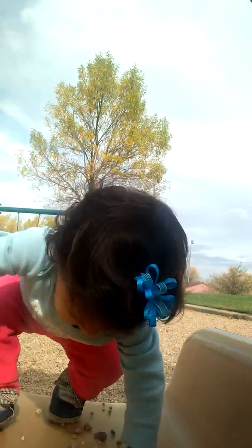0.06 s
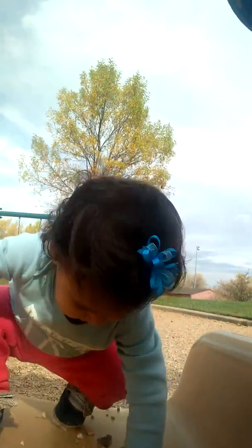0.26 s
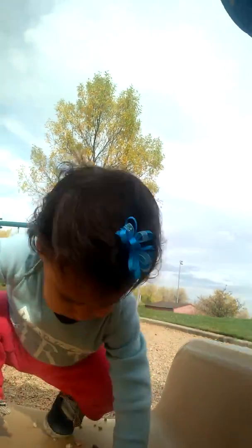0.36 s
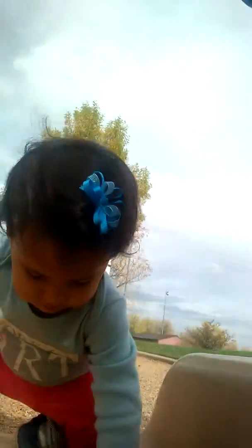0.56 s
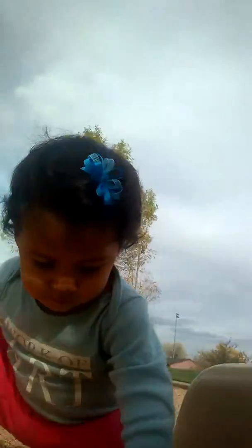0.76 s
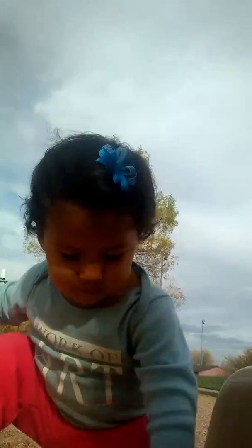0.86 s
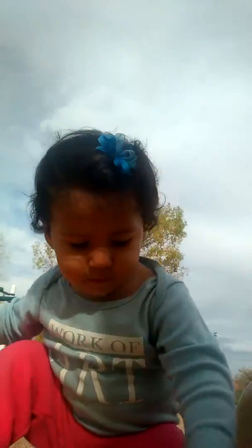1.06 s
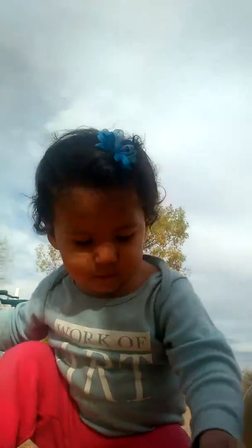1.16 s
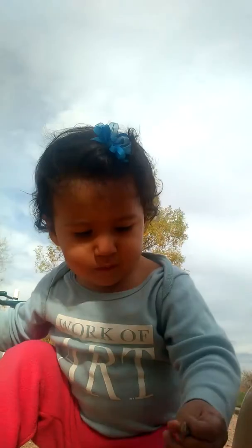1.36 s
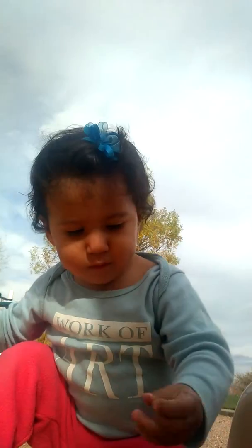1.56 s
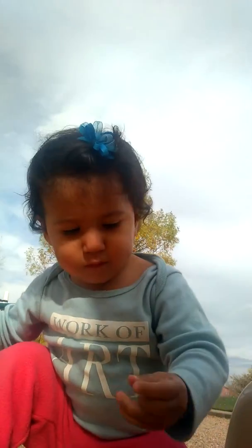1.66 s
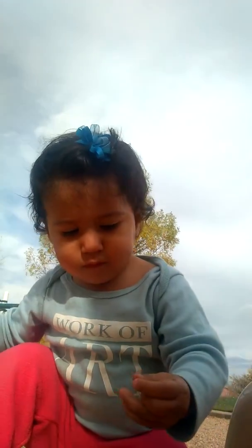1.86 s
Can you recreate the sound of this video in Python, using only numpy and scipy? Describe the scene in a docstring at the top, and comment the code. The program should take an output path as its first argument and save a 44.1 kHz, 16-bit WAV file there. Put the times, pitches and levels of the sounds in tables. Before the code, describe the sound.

Small pebbles are dragged over a hollow plastic playground slide with a gritty, rattling crunch and low bumps, then quieten to sparse ticks and a few sharp clacks, heard close on a phone outdoors.

```python
"""Pebbles are dragged and gathered by a small hand on a hollow plastic slide outdoors.
Random clicks make the shell and stones ring as they roll and scrape; grainy noise makes the grit hiss.
Single pebbles knock with a crack, a clack and a thump, and a thin squeak glides upward.
Filtered noise gives the deep boom, a faint hum and the open air.
A phone's two opposed ports listen: the far one hears later and with opposite sign."""
import sys
import numpy as np
from scipy import signal
from scipy.fft import rfft, irfft, next_fast_len
from scipy.io import wavfile

SR = 44100
rng = np.random.default_rng(int(sys.argv[2]) if len(sys.argv) > 2 else 0)


def volts(x):
    """Linear amplitude factor 10**(x/20) for a level x in dB, scalar or array-like."""
    e = np.asarray(x, float) / 20
    return 10 ** e


def wrap_up_sound(samples):
    """Save the sound to the file named by the first command line argument, as 16-bit audio."""
    columns = np.atleast_2d(samples).T
    # keep every value between -1 and 1, then stretch to whole-number steps
    tamed = np.clip(columns, -1, 1)
    steps = np.round(tamed * 32767).astype(np.int16)
    wavfile.write(sys.argv[1], SR, steps)


N = 83790  # length [samples]

# how strongly the stones drag, before each layer's own gain: (time [s], deep boom [dB],
# low shell ring [dB], high shell ring [dB], scrape [dB], grit [dB])
DRAG_LEVELS = [(0, -47, -59, -43, -43, -40), (.05, -55.5, -71, -48, -44, -46.5),
               (.17, -44, -55, -51, -48.5, -47), (.23, -41.5, -42.5, -41.5, -40.5, -39),
               (0.267, -52, -20, -34.5, -32.5, -34), (.32, -53, -56, -27, -33.5, -31.5),
               (0.357, -46, -53, -20, -34, -31.5), (0.389, -53, -38, -28.5, -30, -33.5),
               (0.427, -69, -67, -22.5, -32, -31.5), (.47, -38.5, -49, -26.5, -34.5, -32.5),
               (.52, -35.5, -35, -23.5, -32, -34.5), (.57, -32, -44, -30, -33.5, -34),
               (0.631, -33, -30, -30, -35, -31.5), (.7, -34, -38.5, -34.5, -37, -35.5),
               (.77, -34, -34, -34.5, -40.5, -36), (.83, -42.5, -34, -39.5, -37.5, -38.5),
               (.91, -37, -37.5, -40.5, -39.5, -38.5), (.97, -29, -35.5, -34, -37.5, -37),
               (1.01, -50, -38, -37, -40.5, -39), (1.05, -39.5, -45, -43.5, -45.5, -46),
               (1.102, -43, -44.5, -48.5, -49, -43.5), (1.134, -52, -70, -58, -58.5, -65.5),
               (1.28, -49, -68, -56, -58.5, -55), (1.4, -54.5, -81, -58.5, -58, -59.5),
               (1.456, -52, -74, -61, -63, -57), (1.474, -50, -36, -76, -52, -54),
               (1.51, -36, -43, -61, -52, -46.5), (1.55, -40.5, -41.5, -48, -46, -47),
               (1.612, -40, -37.5, -64, -45.5, -43), (1.63, -49, -47, -46, -82, -104),
               (1.655, -87, -63, -61, -70, -100), (1.7, -56, -53, -58, -55, -62.5),
               (1.77, -68, -63.5, -69, -80, -66.5), (1.9, -56.5, -77, -69.5, -71, -59.5)]
# single pebbles knocking, before each part's own gain: (time [s], crack peak [dB],
# shell thump [dB], stone clack [dB], dull part of crack [dB]); the last three are relative to the peak
KNOCKS = [(0.0146, -19, -14, -36, -11), (0.0589, -20, -22, -21, -10), (0.0933, -25, -30, -29, -29),
          (0.1342, -26.5, -16, -7, -26), (0.3316, -18.5, -25, -18, 7.5), (0.3547, -24, 11.5, 0.5, 8),
          (0.4264, -18.5, 1, -3, -21), (0.4895, -18, 10.5, -3, -13), (0.7084, -16, -4, -7, 3.5),
          (0.7548, -11, -17, -25, -18), (0.7615, -6, -15, -23, -8.5), (0.8771, -19, -8, 4.5, 5.5),
          (0.9122, -45, 5, -11, -11), (0.9176, -38, 12, -9, -8), (0.9256, -9.5, -12, -13, -10),
          (0.9275, -16.5, 5.5, -1, 4.5), (0.9335, -28, -13, -18, -14), (0.9579, -12, -25, -14.5, -8),
          (0.9714, -23.5, -19, -19, 3.5), (0.989, -2.5, -16, -37, -19.5), (1.1548, -39.5, 4, 0.5, 5),
          (1.1763, -44, -8, 4.5, 9), (1.1951, -41, 0, 3.5, 13.5), (1.2016, -16, -41, -20, -18.5),
          (1.2141, -44, -2, -5, 9.5), (1.2492, -27, -6.5, -18, -12), (1.2815, -36, -18, -23, -22),
          (1.307, -41, -8, -3, -16), (1.3266, -23, -31, -23, -12), (1.3402, -29.5, -27, -8.5, -5),
          (1.3546, -26.5, -5, -20, -10.5), (1.3665, -39.5, -10, -7, -9), (1.4157, -27, -20, -24, -16.5),
          (1.4626, -28.5, -21, -27, -24), (1.4717, -34, 13.5, -20, -20), (1.4998, -44, -13, 15.5, -18),
          (1.5095, -45, 19, -7, -8), (1.5205, -38, -1, 4, -14), (1.5425, -47, 8, 10, -22),
          (1.565, -49, 4, 2, 0), (1.5865, -45, -1, 9, -10), (1.6172, -4, -11, -13, -16.5),
          (1.6193, 2.5, -16.5, -20, -19), (1.6597, -20, -4, -13, -6.5), (1.672, -42, -12, -19, -8),
          (1.6814, -33, -8, -4, -3), (1.696, -41, -16, -9, -4), (1.7245, -39.5, -12, -15, -6),
          (1.7307, -15, -14.5, -22, -22), (1.7817, -10.5, -21.5, -28, -29), (1.7982, -26.5, -13, -19, -16),
          (1.8118, -34, -6, -23, -13), (1.8565, -41, -30, -30, -8), (1.8661, -19, -44, -20, -13.5),
          (1.872, -19.5, -38, -26, -22), (1.882, -30, -30, -37, -15), (1.8904, -21.5, -32, -38, -25)]
# ringing tones of the slide's shell: (frequency [Hz], relative level [dB], time to fall 60 dB [s])
SHELL_MODES = [(250, -11.5, 0.067), (290, 1, 0.017), (351, 3, 0.039), (405.4, 6.5, 0.046), (481, 4, 0.031),
               (581, 3, 0.034), (663, 2, 0.023), (737, 1.5, 0.018), (915, -10.5, 0.019),
               (204, -10.5, 0.065), (1090, -10, 0.012)]
# ringing tones of clacking stones: (frequency [Hz], relative level [dB], time to fall 60 dB [s])
STONE_MODES = [(1145.5, 3.5, 0.011), (1666, 13, 0.0041), (1901, -6.5, 0.009), (1377, 7.5, 0.0058),
               (3495, -8, 0.024)]
# colour of grit and cracks: (frequency [Hz], relative level per Hz [dB])
GRIT_COLOUR = [(800, -59), (1500, -23.5), (2500, -6.5), (3000, -1.5), (3500, -3), (4100, -10), (5100, -1.5),
               (5600, -11), (6400, -9.5), (8000, -10), (9200, -3.5), (10300, -9), (11800, -4.5),
               (13000, -7.5), (14200, -10.5), (15300, -14.5)]
# treble of the grit in time: (time [s], level above the rest [dB])
GRIT_TREBLE_LEVELS = [(0, 0), (.25, -1.5), (.7, -1), (1.1, -0.5), (1.4, 0.5), (1.5, 2.5), (1.65, 1.5),
                      (1.9, -0.5)]
# the faint rising squeak: (time [s], frequency [Hz], level [dB])
SQUEAK_GLIDE = [(1.405, 11300, -85), (1.42, 11900, -62), (1.445, 13300, -60), (1.465, 14300, -62),
                (1.48, 14700, -85)]
# colour of the deep boom: (frequency [Hz], relative level per Hz [dB])
BOOM_COLOUR = [(25, -17), (50, -18.5), (80, -7.5), (125, 0.5), (200, -2), (300, -2.5), (600, -31)]
# strength of the hum, added to its base level: (time [s], level [dB])
HUM_LEVELS = [(0, 3), (1.1, 9), (1.25, 11.5), (1.5, 7.5), (1.6, 15), (1.65, 0), (1.9, -4)]
# colour of open air and microphone hiss: (frequency [Hz], relative level per Hz [dB])
AIR_COLOUR = [(30, -3), (70, 40), (200, 11), (600, -8), (2000, -60), (6000, -41), (15000, -12)]
# tone balance of the far port: (frequency [Hz], gain [dB])
FAR_PORT_TILT = [(60, -1), (300, -1.5), (1000, 0), (2500, 2.5), (3500, -.5), (6500, -1), (7700, .5),
                 (9000, -1.5), (10300, 1.5), (11800, .5), (14000, 2.5)]

TIME_S = np.arange(N) / SR


def rms_one(x):
    """Scales a sound to an rms strength of 1."""
    return x / np.sqrt(np.mean(x ** 2) + 1e-20)


def colour(x, points, lag_s=0):
    """Shapes the spectrum by (Hz, dB) points, with an optional delay."""
    size = next_fast_len(N + 4096)
    hz = np.arange(size // 2 + 1) * SR / size
    p = np.array(points, float)
    gain = volts(np.interp(np.log(hz + 1), np.log(p[:, 0]), p[:, 1]))
    delay = np.exp(-2j * np.pi * hz * lag_s)
    return irfft(rfft(x, size) * gain * delay, size)[:N]


def split(x, hz, side):
    """Keeps the part of a sound below ("low") or above ("high") a frequency."""
    return signal.sosfilt(signal.butter(4, hz, side, fs=SR, output="sos"), x)


def drift(rate_hz):
    """Noise smoothed above rate_hz: slow random wandering of rms 1."""
    r = np.exp(-2 * np.pi * rate_hz / SR)
    noise = rng.standard_normal(N + 8000)
    return rms_one(signal.lfilter([1], [1, -2 * r, r * r], noise)[8000:])


def ring(clicks, hz, t60_s):
    """A two-pole resonance: a unit click starts a fading sine of starting height 1."""
    r, w = volts(-60 / (t60_s * SR)), 2 * np.pi * hz / SR
    return signal.lfilter([0, np.sin(w)], [1, -2 * r * np.cos(w), r * r], clicks + 1e-18)


def contacts(rate_per_s, spread_db, clump_db):
    """Stones touch in random clicks of uneven size and either sign, stronger in clumps."""
    uneven = np.minimum(rng.exponential(1, N), 2.5)
    sizes = volts(spread_db * uneven + clump_db) * rng.choice([-1, 1], N)
    return sizes * (rng.random(N) < rate_per_s / SR)


def body(clicks, modes, t60_share=1, lag_cycles=0, vary_db=3.0):
    """Every click strikes each mode with its own strength; a lag in cycles lets high modes speak first."""
    total = 0
    for hz, db, t60_s in modes:
        strikes = np.roll(clicks, int(lag_cycles * SR / hz)) * volts(db + vary_db * rng.standard_normal(N))
        total = total + ring(strikes, hz, t60_s * t60_share)
    return total


def drag_gains():
    """The drag table as five smooth gains: boom, low shell, high shell, scrape, grit."""
    s, *columns = np.transpose(DRAG_LEVELS)
    return [volts(np.interp(TIME_S, s, c)) for c in columns]


def rolling_shell(low_gain, high_gain, clump):
    """Rolling stones strike the hollow shell, whose low and high modes ring."""
    rolls = contacts(2400, spread_db=2.0, clump_db=clump)
    low_modes = [m for m in SHELL_MODES if m[0] < 450]
    high_modes = [m for m in SHELL_MODES if m[0] >= 450]
    shell = low_gain * rms_one(body(rolls, low_modes)) + high_gain * rms_one(body(rolls, high_modes))
    return signal.lfilter(*signal.butter(1, 2000, fs=SR), shell)  # softer above 2000 Hz


def scraping_stones(clump):
    """Stones rub on each other: dense clicks set the stone modes ringing."""
    return rms_one(body(contacts(2500, spread_db=2, clump_db=1.1 * clump), STONE_MODES))


def grinding_grit(clump):
    """Grit hisses: coloured noise, partly steady and partly in tiny fading grains."""
    GRAIN_T60_S, STEADY_SHARE, TREBLE_FROM_HZ = .004, .9, 7500
    fade = volts(-60 / (GRAIN_T60_S * SR))
    clicks = np.abs(contacts(1100, spread_db=4.0, clump_db=0.26 * clump))
    grains = signal.lfilter([1], [1, -fade], clicks)
    hiss = colour((STEADY_SHARE + rms_one(grains)) * rng.standard_normal(N), GRIT_COLOUR)
    treble_gain = volts(np.interp(TIME_S, *np.transpose(GRIT_TREBLE_LEVELS)))
    return rms_one(split(hiss, TREBLE_FROM_HZ, "low") + split(hiss, TREBLE_FROM_HZ, "high") * treble_gain)


def drag():
    """Stones roll on the shell, scrape on each other and grind grit, all in the same clumps."""
    SHELL_DB, SCRAPE_DB, GRIT_DB = 9.5, 3, 6.5
    _, low_gain, high_gain, scrape_gain, grit_gain = drag_gains()
    clump = 1.3 * drift(90)  # dB
    shell = volts(SHELL_DB) * rolling_shell(low_gain, high_gain, clump)
    scrape = volts(SCRAPE_DB) * scrape_gain * scraping_stones(clump)
    return shell + scrape + volts(GRIT_DB) * grit_gain * grinding_grit(clump)


def knock_clicks(db):
    """One click per knock, at the given levels."""
    clicks = np.zeros(N)
    at = (np.array(KNOCKS)[:, 0] * SR).astype(int)
    clicks[np.clip(at, 0, N - 1)] = volts(db)
    return clicks


def crack(db, side):
    """A sharp contact: noise with a quick rise, a short fade and a fainter, longer tail."""
    RISE_S, T60_S, TAIL_DB, TAIL_T60_S, SPLIT_HZ = 0.00029, 0.0038, -13.5, 0.015, 5600
    rise, clicks = np.exp(-1 / (RISE_S * SR)), knock_clicks(db) + 1e-18
    burst = 0
    for gain_db, t60_s in [(0, T60_S), (TAIL_DB, TAIL_T60_S)]:
        poles = np.convolve([1, -rise], [1, -volts(-60 / (t60_s * SR))])
        burst = burst + volts(gain_db) * signal.lfilter([1 - rise], poles, clicks)
    noise = .5 * rng.standard_normal(N) + rng.choice([-1, 1], N)
    return split(burst * noise, SPLIT_HZ, side)


def ticks():
    """Each knock: a crack with a faint tail, a clack of stone and a short falling thump of the shell."""
    CRACK_DB, DULL_DB, THUMP_DB, CLACK_DB = 9, 17, -0.5, 0.5
    BENDING_LAG_CYCLES, VARY_DB = 1.3, 1.8
    _, peak, thump, clack, dull = np.transpose(KNOCKS)
    cracks = colour(crack(peak + CRACK_DB, "high") + crack(peak + dull + DULL_DB, "low"), GRIT_COLOUR)
    thumps = body(knock_clicks(peak + thump + THUMP_DB), SHELL_MODES, .22, BENDING_LAG_CYCLES, VARY_DB)
    clacks = body(knock_clicks(peak + clack + CLACK_DB), STONE_MODES, 1, BENDING_LAG_CYCLES, VARY_DB)
    return cracks + thumps + clacks


def squeak():
    """A thin gliding sine, its pitch and level slightly rough."""
    s, hz, db = np.transpose(SQUEAK_GLIDE)
    pitch = np.interp(TIME_S, s, hz) * (1 + .008 * drift(300))
    level = np.interp(TIME_S, s, db, -200, -200) + 3 * drift(150)
    return volts(level) * np.sin(2 * np.pi * np.cumsum(pitch) / SR)


def widening_tail(x):
    """A short random bright tail, slowly varied in strength and sign, that makes the channels less alike."""
    FROM_HZ, T60_S, DRIFT_HZ = 900, .015, 25
    tail = rng.standard_normal(800) * volts(-60 * TIME_S[:800] / T60_S)
    bright = signal.lfilter(*signal.butter(2, FROM_HZ, "high", fs=SR), x)
    smeared = signal.fftconvolve(bright, tail / np.sqrt(np.sum(tail ** 2)))[:N]
    return drift(DRIFT_HZ) * smeared


def boom():
    """Deep rumble of the hollow slide: low noise that follows the drag and swells unevenly."""
    uneven = volts(2.76 * drift(4.8))
    rumble = rms_one(colour(rng.standard_normal(N), BOOM_COLOUR) * uneven)
    return volts(4.5) * drag_gains()[0] * rumble


def hum():
    """A faint low hum that wavers: noise in one narrow resonance."""
    BASE_DB, PITCH_HZ, T60_S = -61.5, 71.6, 3.7 / 11.5
    level = np.interp(TIME_S, *np.transpose(HUM_LEVELS))
    return volts(BASE_DB + level) * rms_one(ring(rng.standard_normal(N), PITCH_HZ, T60_S))


def air():
    """Open air and microphone hiss: steady coloured noise."""
    return volts(-85) * rms_one(colour(rng.standard_normal(N), AIR_COLOUR))


def scene():
    """The far port (first channel) hears the near port's sound later and with opposite sign."""
    PORT_LAG_S, FAR_DB, APART_DB, LOW_CUT_HZ = .000392, -3, -14, 168
    OWN_BOOM_DB = -0.5  # extra boom that each port feels alone
    pebbles = drag() + ticks() + squeak()
    pebbles = signal.lfilter(*signal.butter(2, LOW_CUT_HZ, "high", fs=SR), pebbles)
    near = pebbles + boom() + air()
    far = -volts(FAR_DB) * colour(near, FAR_PORT_TILT, PORT_LAG_S)
    wide = volts(APART_DB) * widening_tail(pebbles)  # opposite sign in the two ports
    far_boom, near_boom = [volts(OWN_BOOM_DB + db) * boom() for db in (FAR_DB, 0)]
    return np.array([far + wide + far_boom, near - wide + near_boom]) + hum()


def band_limit(x):
    """A steep low-pass at the top of the band."""
    return signal.sosfilt(signal.butter(12, 16450, fs=SR, output="sos"), x)


def record(dry):
    """Peaks beyond full scale overload and are clipped; then the top is cut."""
    top_cut = signal.cheby2(10, 40, 16400, fs=SR, output="sos")  # 40 dB down from 16400 Hz up
    mix = signal.sosfilt(top_cut, np.clip(dry, -1, 1))
    return band_limit(np.clip(mix, -1, 1))


dry = scene()
out = record(dry)
wrap_up_sound(out)
```